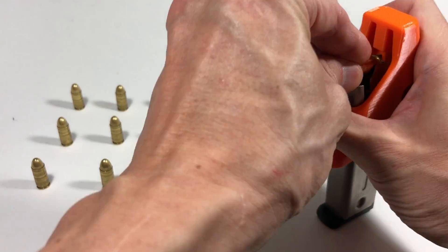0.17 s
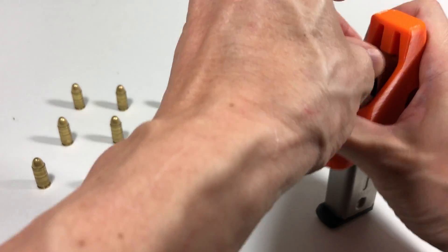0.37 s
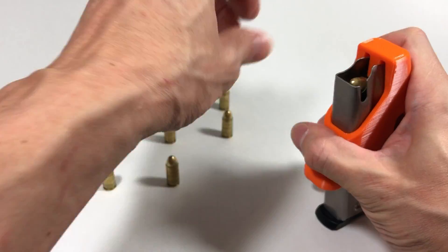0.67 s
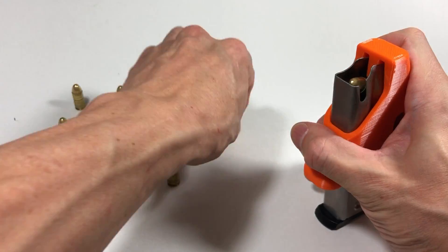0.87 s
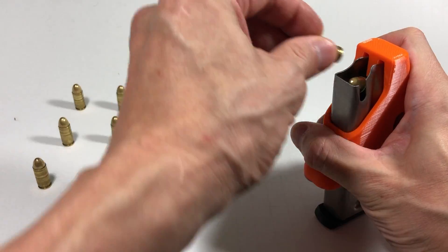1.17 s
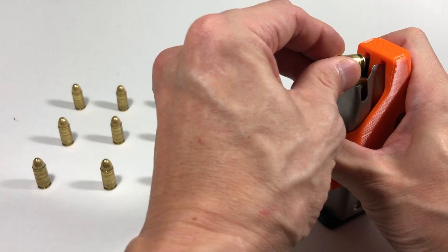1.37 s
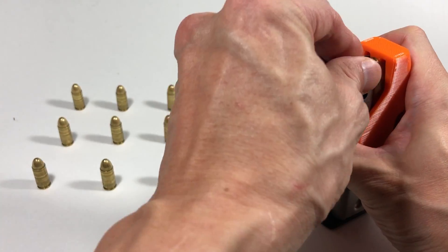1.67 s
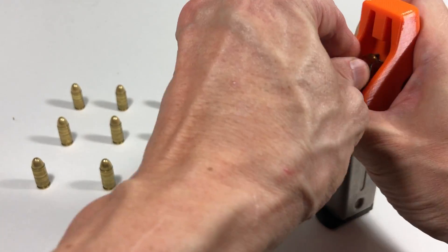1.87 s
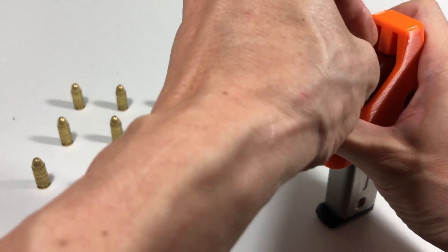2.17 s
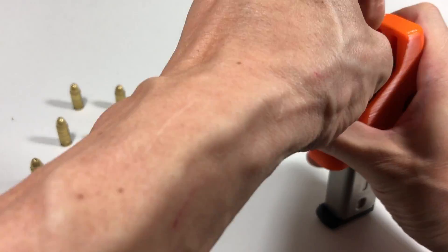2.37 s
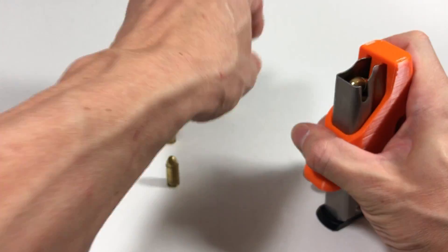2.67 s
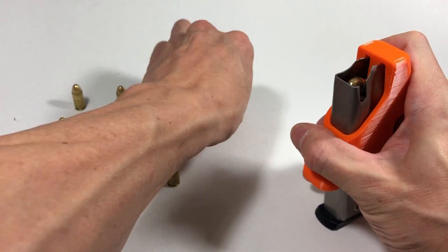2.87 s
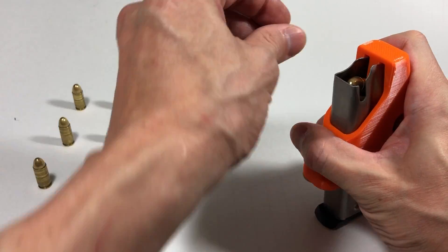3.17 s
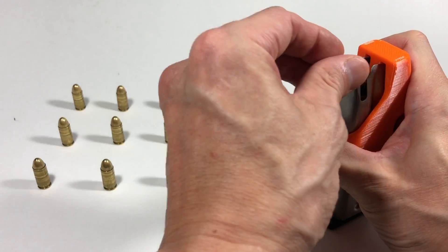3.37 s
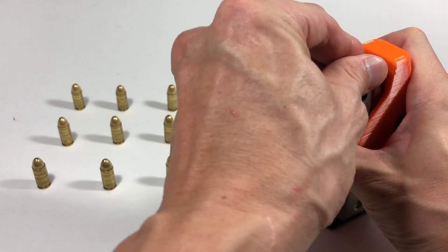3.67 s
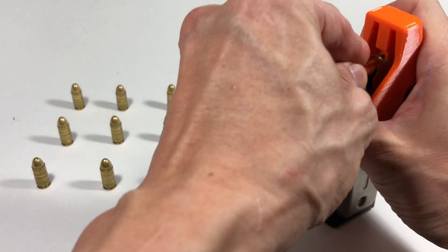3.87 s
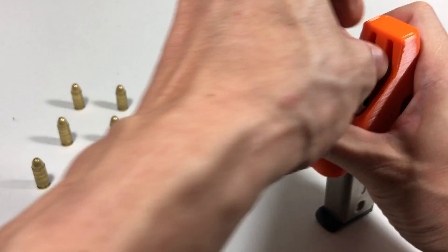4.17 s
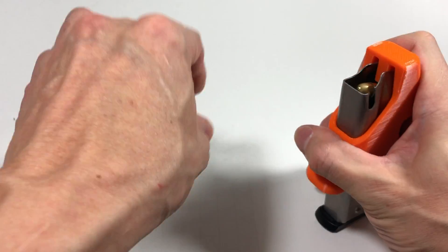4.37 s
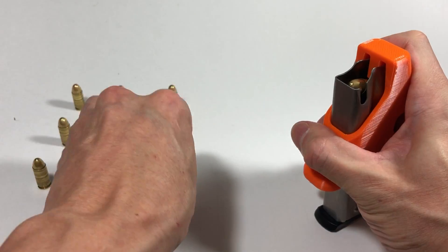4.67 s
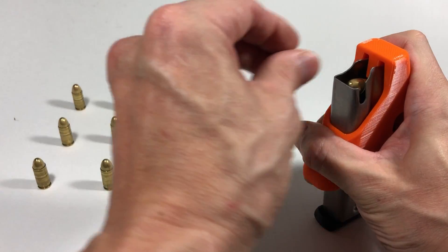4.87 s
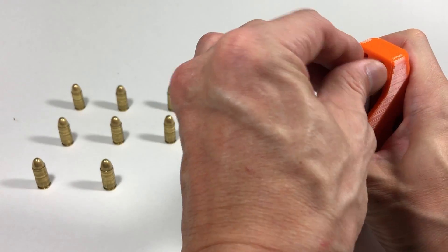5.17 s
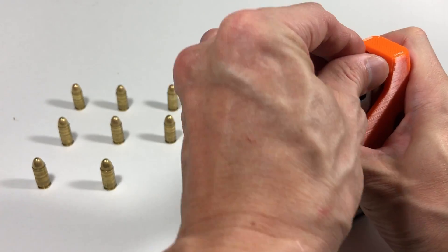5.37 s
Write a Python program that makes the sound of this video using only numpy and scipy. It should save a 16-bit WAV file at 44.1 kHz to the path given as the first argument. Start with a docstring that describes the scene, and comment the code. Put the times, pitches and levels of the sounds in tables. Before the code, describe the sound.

Hand loading of a magazine over a table, heard near the microphone. Crisp brass-on-steel snaps alternate with hollow plastic knocks, gritty slides and dull thuds. Bursts cluster early, around one and a half to two and a half seconds, and near four; a very bright snap comes after five. Faint room hiss and short reflections surround it.

```python
"""Loading cartridges into a magazine

Brass cartridges are pressed one by one through a plastic loader into a steel magazine on a table.
Each contact snaps in the metal and sends a bending wave through the table top, treble first, bass last.
Between clicks, irregular stick-slip jerks scrape the loader and rounds along the steel.
Light taps, rattling rounds, low bumps and two squeaks join in; a small quiet room answers."""
import sys
import numpy as np
from scipy import signal
from scipy.fft import rfft, irfft, next_fast_len
from scipy.io import wavfile
from scipy.ndimage import uniform_filter1d

SR = 44100
rng = np.random.default_rng(int(sys.argv[2]) if len(sys.argv) > 2 else 0)


def transcribe(signal):
    """Save signal, clipped to [-1, 1], as a 16-bit WAV file at the path in sys.argv[1]."""
    frames = np.atleast_2d(signal).T
    limited = np.clip(frames, -1, 1)
    pcm = np.round(limited * 32767).astype(np.int16)
    wavfile.write(sys.argv[1], SR, pcm)


N = 243431

# Loader strokes: start t/s, end t/s, table rumble level/dB and steel scrape level/dB (both before
# the band gains), swell from start to end/dB
SLIDES = [(0.045, 0.067, -52, -62, 9.5), (0.074, 0.13, -41.5, -46.5, -5.5), (0.132, 0.187, -54, -71, -2.5),
          (0.299, 0.37, -72, -66, -4), (0.409, 0.462, -56, -53.5, 22.5), (0.643, 0.73, -43, -51, 13),
          (1.364, 1.373, -65, -56, 3), (1.637, 1.71, -61.5, -60.5, -6), (1.835, 1.906, -42, -47, 5),
          (1.907, 1.968, -54, -64.5, -6.5), (2.031, 2.175, -59.5, -70, 1), (2.167, 2.208, -68, -57.5, 8),
          (2.342, 2.382, -50.5, -50, 0.5), (2.495, 2.572, -51, -56.5, 9), (2.628, 2.67, -33.5, -38, 10.5),
          (3.429, 3.576, -70, -65, 1), (3.756, 3.825, -45.5, -49, 7), (3.819, 3.857, -42, -58, -3),
          (3.953, 3.986, -49, -72, -2), (4.042, 4.095, -58.5, -51.5, 6), (4.104, 4.147, -48.5, -65, -5),
          (4.191, 4.29, -46.5, -74, 6), (4.301, 4.333, -40, -45, -4), (4.391, 4.431, -41.5, -50, -5),
          (4.503, 4.518, -61, -53.5, 7), (4.557, 4.58, -58.5, -73.5, 1), (5.204, 5.25, -64.5, -72, -9)]
# Magazine and loader resonances: f/Hz, width/Hz, lift/dB
MAGAZINE_MODES = [(2220, 130, 17), (3650, 450, 0.5), (4190, 76, 3), (4825, 450, 1.5), (6840, 760, 7.5),
                  (7670, 400, 5.5), (8550, 330, 6), (9550, 270, 4.5), (12300, 500, 1.5), (13600, 300, -10)]
# Table top resonances: f/Hz, width/Hz, lift/dB
TABLE_MODES = [(50.3, 3.3, 14), (102, 92, 5.5), (170, 14, -3), (271, 15, 2), (373, 32, 8.5), (459, 23, 4),
               (524, 60, 3.5), (840, 110, 2.5), (1006, 350, 3.5)]
# Lasting tones of table and frame: f/Hz, relative level/dB, t60/s
RING_TONES = [(156, -6, 1.0), (225, -6, 1.3), (355, -11, .9), (404, -3, 1.0), (549, -15, 1.8),
              (635, -7, 1.4), (791, -1, 1.6), (888, -10, 1.7)]
# Room decay: f/Hz, t60/s
ROOM_T60 = [(60, 0.09), (250, 0.91), (700, 0.4), (2000, 0.425), (5000, 0.27), (9000, 0.3), (16000, 0.52)]
# Room tail: f/Hz, level/dB
ROOM_LEVEL = [(60, -1), (150, -2), (400, -15.5), (1000, -11.5), (2500, -9), (5000, -9.5), (9000, -18.5),
              (16000, -26.5)]
# Still air spectrum: f/Hz, relative density level/dB
AIR_SPECTRUM = [(20, -15.5), (50, 1), (120, -2), (300, -8), (700, -11), (1500, -23), (4000, -26),
                (10000, -28.5), (16000, -36.5)]
# Magazine base leaning into the table: t/s, energy level/dB, f/Hz
BUMPS = [(1.867, -23.5, 101), (2.212, -29, 126.3), (2.665, -16, 119), (4.564, -22.5, 79.3)]
# Plastic squeaking on steel: start t/s, end t/s, slip rate/Hz, level/dB
SQUEAKS = [(4.342, 4.373, 560, -50.5), (4.507, 4.519, 650, -54)]
# Brass against the steel lips: t/s, metal energy level/dB, snap over clack/dB,
# loader and table level before offsets/dB, contact decay/s
SNAPS = [(0.072, -20.5, 6.5, -25, 0.0026), (0.0798, -3, 3, -26.5, 0.0015), (0.4516, -8, -8, -10, 0.0024),
         (0.4599, -2, -2, -12, .0008), (0.653, -16, -2.5, -22.5, 0.0052), (0.66, -7.5, 3.5, -30.5, 0.0025),
         (0.666, -12.5, -4.5, -22.5, 0.00079), (0.732, -5.5, 6.5, -12.5, 0.0027),
         (1.279, -6.5, -5, -16, 0.0059), (1.4338, -11.5, 3.5, -20.5, 0.0028),
         (1.5378, -14.5, 0.5, -16, 0.0087), (1.5662, 3.5, 12, -10.5, 0.0025),
         (1.57, 3, 15.5, -15.5, 0.0054), (1.841, -2, 13, -25, 0.0016), (1.852, -9, 6, -25, .0012),
         (2.3377, -0.9, 2.5, -24, 0.0014), (2.385, -9, -2.5, -15, .0008), (2.662, -5, 6.5, -17.5, 0.0011),
         (3.403, -3.5, 0.5, -16.5, 0.0067), (3.7428, -23, 8, -34, 0.0018), (3.7919, -4, 34, -19, 0.0019),
         (4.046, -15, 2.5, -32, 0.0017), (4.407, -12, -2, -17.5, 0.0043), (4.417, -6.5, 9, -13.5, 0.0019),
         (4.431, -11, 6, -16, 0.00092), (5.028, -13.5, 2, -19.5, 0.008), (5.2405, -4.5, 2, -6.5, 0.0047),
         (5.2435, 4, 11.5, -11, 0.0065), (5.514, -13.5, 7, -20, 0.011)]
# Push bottoms out, magazine knocks on the table: t/s, thud level before gain/dB, thud f/Hz, clack level/dB
KNOCKS = [(0.4407, -5.5, 360, -9), (0.471, -15.5, 230, -34), (0.674, -10.5, 373, -27),
          (0.7076, -19, 340, -21), (0.9849, -32, 354, -43), (1.867, -9, 335, -16), (2.2033, -1, 390, -14.5),
          (2.375, -11, 350, -18.5), (2.55, -14, 330, -22.5), (2.633, -14.5, 418, -30), (2.669, 1, 360, -16),
          (3.502, -29.5, 330, -38), (3.5776, -22, 400, -34), (3.7674, -13, 372, -21),
          (4.085, -5.5, 324, -10), (4.098, -6, 320, -41), (4.104, -13, 265.4, -23),
          (4.186, -12.5, 238, -15.5), (4.241, -18, 312, -45), (4.397, -12.5, 450, -41),
          (4.533, -24.5, 388, -58), (4.55, -19, 346, -27), (4.564, -10.5, 290, -27), (5.028, -14, 394, -30),
          (5.463, -29.5, 290, -46.5)]
# Round rocking lightly in the loader: t/s, knock level/dB, knock f/Hz, clack level/dB
TAPS = [(0.3172, -36.5, 1960, -23.5), (0.35, -32, 2220, -40), (0.5905, -24, 2400, -25.5),
        (1.3721, -26.5, 1750, -34), (1.5381, -20, 1716, -35.5), (1.707, -19, 1700, -42),
        (2.0994, -41.5, 2500, -32), (2.118, -25, 2266, -31), (3.4131, -15, 2300, -26),
        (3.593, -15, 2020, -23.5), (3.846, -25.5, 2000, -22.5), (3.9016, -28, 2170, -35),
        (3.978, -31, 2240, -31.5), (4.279, -25.5, 2300, -26.5), (5.115, -19, 2030, -18.5),
        (5.369, -18, 1911, -30)]

AIR_DB = -70.5  # rms
EDGE_HZ = 16500
LEAD_S = .05  # stroke envelope starts this early
# Rumble pitch rises from dull to keen once the steel bites (scrape minus rumble level)
DULL_HZ, KEEN_HZ, KEEN_AT_DB, KEEN_WIDTH_DB = 200, 377, -9, 4.5
SNAP_THUD_HZ, SNAP_THUD_DB, SNAP_KNOCK_HZ, SNAP_KNOCK_DB = 358, -4, 2320, -0.5
# Accented metal mode falls with brightness, capped at EDGE_HZ
SNAP_RING_HZ, RING_OCTAVES_PER_DB = 7500, -2
# Whole-magazine jolt: steep level law, so the hardest snaps dominate
SEAT_HZ, SEAT_DB, SEAT_DB_PER_DB, SEAT_RING_S, SEAT_LAG_S = 981, -23.5, 3, 0.0029, .002
KNOCK_HZ, KNOCK_DB, KNOCK_RING_HZ, KNOCK_SNAP_DB, KNOCK_DECAY_S = 880, -9, 4850, -3, 0.0018
TAP_THUD_HZ, TAP_THUD_DB, TAP_RING_HZ, TAP_SNAP_DB, TAP_DECAY_S = 290, -9, 4230, -6.5, .0008
# Fingers that press harder also damp the wall, so its level is capped
WALL_HZ, WALL_RING_S, TAP_WALL_DB, WALL_LIMIT_DB = 2180, .0024, -1, -26
# Energy over the scrape level, and its scatter either way
RATTLE_DB, RATTLE_SPREAD_DB = 18.5, 10


def amp(db):
    """Converts dB to an amplitude factor."""
    return 10 ** (np.asarray(db) / 20)


def unit(x):
    """Scales to energy 1."""
    return x / np.sqrt(np.sum(x ** 2) + 1e-20)


def evened(x):
    """Scales to rms 1."""
    return unit(x) * np.sqrt(len(x))


def read(points, hz):
    """Interpolates a spectrum on a log-frequency axis."""
    f, value = np.transpose(points)
    return np.interp(np.log(hz + 1), np.log(f), value)


def add(mix, start_s, sound):
    """Mixes a sound in at start_s, in place."""
    part = mix[..., max(round(start_s * SR), 0):][..., :sound.shape[-1]]
    part += sound[..., :part.shape[-1]]


def band(x, lo_hz, hi_hz, order=2):
    """Causal band-pass."""
    edges_hz = [lo_hz, min(hi_hz, .48 * SR)]
    return signal.sosfilt(signal.butter(order, edges_hz, "bandpass", fs=SR, output="sos"), x)


def body(x, modes):
    """Lifts each resonance of a body out of the sound that drives it."""
    for hz, width_hz, db in modes:
        x = x + (amp(db) - 1) * signal.lfilter(*signal.iirpeak(hz, hz / width_hz, SR), x)
    return x


def still_air():
    """Low room rumble and a thin hiss: shaped noise."""
    shape = amp(read(AIR_SPECTRUM, np.fft.rfftfreq(N, 1 / SR)))
    noise = irfft(rfft(rng.standard_normal(N)) * shape, N)
    return amp(AIR_DB) * evened(noise)


def slips(seconds, swell_db, per_s=1500, spread_db=2.5, grit=0.57, rise_s=0.0031, fall_s=.003,
          brush_db=-15, brush_s=0.017, size=13000):
    """Stick and slip: uneven jerks in clumps over faint noise; also returns the stroke's envelope."""
    t = np.arange(size) / SR - LEAD_S
    height = amp(spread_db * np.minimum(rng.exponential(1, size), 3))
    jerks = height * rng.choice([-1, 1], size) * (rng.random(size) < per_s / SR)
    slow_noise = evened(uniform_filter1d(rng.standard_normal(size), size=180))
    clumps = np.exp(grit * np.tanh(slow_noise))
    onset = 1 - np.exp(-np.maximum(t, 0) / rise_s)
    stroke = onset * np.exp(-np.maximum(t - seconds, 0) / fall_s)
    # light brushing just before and after the stroke
    brush = amp(brush_db) * np.exp(-abs(t - np.clip(t, 0, seconds)) / brush_s)
    swell = amp(swell_db * (np.clip(t / max(seconds, .005), 0, 1) - .5))
    drag = (jerks + 0.098 * rng.standard_normal(size)) * clumps
    return drag, np.maximum(stroke, brush) * swell


def slides(rumble_gain_db=-3, rub_gain_db=-4, scrape_gain_db=-2, hiss_gain_db=-3, lift_db=4, width_hz=150):
    """Loader and cartridge drag along the magazine and shake the table: rows (table, metal)."""
    out = np.zeros((2, N))
    for start_s, end_s, rumble_db, steel_db, swell_db in SLIDES:
        drag, stroke = slips(end_s - start_s, swell_db)
        bite = (1 + np.tanh((steel_db - rumble_db - KEEN_AT_DB) / KEEN_WIDTH_DB)) / 2
        rumble_hz = DULL_HZ + (KEEN_HZ - DULL_HZ) * bite
        # broad table band around the rumble pitch
        rumble = band(drag, 29, 1.55 * rumble_hz, order=3)
        rumble = band(rumble, 0.22 * rumble_hz, 3600, order=1)
        rumble = body(rumble, list(TABLE_MODES) + [(rumble_hz, width_hz, lift_db)])
        rumble = amp(rumble_gain_db) * evened(rumble)
        steel = body(drag, MAGAZINE_MODES)
        rub = amp(rub_gain_db) * evened(body(band(steel, 720, 2200), [(2300, 390, 2.5)]))
        scrape = amp(scrape_gain_db) * evened(band(steel, 3000, 6200))
        hiss = amp(hiss_gain_db) * evened(band(steel, 7000, 15500))
        rows = np.array([amp(rumble_db) * rumble, amp(steel_db) * (rub + scrape + hiss)])
        add(out, start_s - LEAD_S, stroke * rows)
    return out


def bending_wave(lag_s, size=8192):
    """A pulse after crossing the table: dispersion delay falls as 1 / sqrt(f), less a fixed offset."""
    hz = np.fft.rfftfreq(size, 1 / SR)
    delay_s = np.clip(lag_s * np.sqrt(1000 / (hz + 1)) - .0048, .0004, .06)
    fade = np.minimum(np.linspace(2, 0, size), 1)
    # phase is the integral of group delay
    return irfft(np.exp(-2j * np.pi * np.cumsum(delay_s) * SR / size)) * fade


def table_blow(lag_s=.0082, edge_lag_s=0.016, edge_db=-11, scatter_db=-7, scatter_s=0.014):
    """Direct bending wave, its echo from the table's edge, and scattered later waves."""
    near, far = rng.uniform(.88, 1.12, 2)
    wave = bending_wave(lag_s * near) + amp(edge_db) * bending_wave(edge_lag_s * far)
    t = np.arange(len(wave)) / SR
    scatter = unit(rng.standard_normal(len(t)) * np.exp(-t / scatter_s))
    scattered = signal.fftconvolve(wave, scatter)[:len(t)]
    return body(wave + amp(scatter_db) * scattered, TABLE_MODES)


def contact(decay_s, spike_db, size=3000, rattle_db=-9, rattle_s=.007, count=4):
    """Force of a contact: a first spike, a dying chatter, and a few small rebounds."""
    t = np.arange(size) / SR
    chatter = unit(rng.standard_normal(size) * np.exp(-t / max(decay_s, .0004)))
    force = chatter + amp(spike_db) * (t == 0)
    hits = 1. * (t == 0)
    for after_s in rng.exponential(rattle_s, count):
        add(hits, after_s, amp(rattle_db) * rng.uniform(-1, 1, 1))
    return signal.fftconvolve(force, hits)[:size]


def metal_blow(decay_s, ring_hz, ring_db=-12, ring_s=0.0035, spike_db=-4,
               main_db=4, main_width_hz=1600, count=120):
    """A contact rings many short modes of case and magazine, with extra lift around ring_hz."""
    force = contact(decay_s, spike_db)
    t = np.arange(len(force)) / SR
    hz = rng.uniform(2000, 16000, (count, 1))
    tones = rng.standard_normal((count, 1)) * np.sin(2 * np.pi * hz * t)
    modes = tones.sum(0) * np.exp(-t / ring_s)
    return body(force + amp(ring_db) * unit(modes), list(MAGAZINE_MODES) + [(ring_hz, main_width_hz, main_db)])


def plastic_knock(wave, decay_s, knock_hz, direct_db=-2, tok_db=5, tok_damping=0.24):
    """The loader's knock: once straight through the air, once by way of the table."""
    knock = unit(signal.fftconvolve(wave, contact(2 * decay_s, spike_db=-0.5)))
    add(knock, 0, amp(direct_db) * unit(contact(2 * decay_s, spike_db=-9.5)))
    return body(band(knock, 700, 2800, order=3), [(knock_hz, tok_damping * knock_hz, tok_db)])


def strike(thud_db, thud_hz, knock_db, knock_hz, clack_db, snap_db, ring_hz, decay_s,
           lift_db=5, thud_width_hz=170):
    """One contact sounds through the table and straight from the metal: rows (table, metal)."""
    wave, blow = table_blow(), metal_blow(decay_s, ring_hz)
    out = np.zeros((2, len(wave) + len(blow)))
    # thud band follows thud_hz
    thud = band(wave, 29, 2 * thud_hz, order=3)
    thud = band(thud, 0.43 * thud_hz, 4000, order=1)
    thud = body(thud, [(thud_hz, thud_width_hz, lift_db)])
    add(out[0], 0, amp(thud_db) * unit(thud))
    add(out[0], 0, amp(knock_db) * unit(plastic_knock(wave, decay_s, knock_hz)))
    add(out[1], 0, amp(clack_db) * unit(band(blow, 3310, 6040)))
    add(out[1], 0, amp(snap_db) * unit(band(blow, 8000, 17500, order=3)))
    return out


def rattle(pitch_hz=2000, pitch_spread_octaves=0.37, knock_db=-3, count=3):
    """Loose rounds jostle at random moments of each stroke; their level follows the scrape."""
    out = np.zeros((2, N))
    for start_s, end_s, _, steel_db, swell_db in SLIDES:
        for along, size, detune in rng.uniform(-1, 1, (count, 3)):
            db = steel_db + swell_db * along / 2 + RATTLE_DB + RATTLE_SPREAD_DB * size
            tune = 2 ** (pitch_spread_octaves * detune)
            at_s = start_s + (end_s - start_s) * (along + 1) / 2
            add(out, at_s, strike(db + TAP_THUD_DB, TAP_THUD_HZ, db + knock_db, pitch_hz * tune,
                                  db, db + TAP_SNAP_DB, TAP_RING_HZ * tune, TAP_DECAY_S))
    return out


def mode(hz, ring_s, rise_s=0.0012):
    """One mode of the magazine, which the hand damps at once."""
    t = np.arange(SR // 20) / SR
    return unit(np.sin(2 * np.pi * hz * t) * np.exp(-t / ring_s) * (1 - np.exp(-t / rise_s)))


def snaps():
    """Hard contacts of brass and steel; brightness shares their energy between clack and snap."""
    out = np.zeros((2, N))
    for at_s, db, bright_db, body_db, decay_s in SNAPS:
        clack_db = db - 10 * np.log10(1 + amp(bright_db) ** 2)
        ring_hz = min(SNAP_RING_HZ * 2 ** (RING_OCTAVES_PER_DB * bright_db), EDGE_HZ)
        add(out, at_s, strike(body_db + SNAP_THUD_DB, SNAP_THUD_HZ, body_db + SNAP_KNOCK_DB, SNAP_KNOCK_HZ,
                              clack_db, clack_db + bright_db, ring_hz, decay_s))
        seat = amp(SEAT_DB + SEAT_DB_PER_DB * db) * mode(SEAT_HZ, SEAT_RING_S)
        add(out[0], at_s + SEAT_LAG_S, seat)
    return out


def tap(db, hz, clack_db):
    """A light, short contact sounds the loader, the metal and the magazine's wall."""
    out = strike(db + TAP_THUD_DB, TAP_THUD_HZ, db, hz,
                 clack_db, clack_db + TAP_SNAP_DB, TAP_RING_HZ, TAP_DECAY_S)
    add(out[1], 0, amp(min(db + TAP_WALL_DB, WALL_LIMIT_DB)) * mode(WALL_HZ, WALL_RING_S))
    return out


def taps():
    """The rounds rock against the loader as the fingers place them."""
    out = np.zeros((2, N))
    for at_s, db, hz, clack_db in TAPS:
        add(out, at_s, tap(db, hz, clack_db))
    return out


def knocks(thud_gain_db=-1):
    """Heavy contacts that go mostly into the table."""
    out = np.zeros((2, N))
    for at_s, db, hz, clack_db in KNOCKS:
        add(out, at_s, strike(db + thud_gain_db, hz, db + KNOCK_DB, KNOCK_HZ,
                              clack_db, clack_db + KNOCK_SNAP_DB, KNOCK_RING_HZ, KNOCK_DECAY_S))
    return out


def bumps():
    """Slow pushes that move only the lowest waves of the table."""
    out = np.zeros(N)
    for at_s, db, hz in BUMPS:
        add(out, at_s, amp(db) * unit(band(table_blow(lag_s=0.00502), hz / 2, 1.32 * hz)))
    return out


def squeaks(jitter=0.068, lo_hz=2500, hi_hz=4000):
    """Plastic on steel: nearly regular slip pulses, band-passed."""
    out = np.zeros(N)
    for start_s, end_s, per_s, db in SQUEAKS:
        size = int(max(end_s - start_s, .005) * SR)
        wobble = evened(uniform_filter1d(rng.standard_normal(size), size=200))
        turns = np.cumsum(per_s * (1 + jitter * wobble)) / SR
        pulses = np.diff(np.floor(turns), prepend=-1)
        squeak = evened(band(pulses, lo_hz, hi_hz)) * signal.windows.tukey(size, .3)
        add(out, start_s, amp(db) * squeak)
    return out


def table_ring(x):
    """A few weakly damped modes, driven by the table signal, hum on."""
    t = np.arange(2 * SR) / SR
    tones = sum(amp(db - 60 * t / t60_s) * np.sin(2 * np.pi * hz * t) for hz, db, t60_s in RING_TONES)
    return amp(-71) * signal.fftconvolve(x, tones)[:N]


def room(x, first_s=0.0067, early_db=-12, early_s=.016, count=9):
    """A few near reflections, then a diffuse tail with a decay time per frequency."""
    hz, t, z = signal.stft(rng.standard_normal(SR), SR, nperseg=512)
    t60_s = read(ROOM_T60, hz)[:, None]
    # tail energy independent of its t60
    height = amp(read(ROOM_LEVEL, hz))[:, None] * np.sqrt(2 * np.log(1000) / (t60_s * SR))
    tail = signal.istft(z * height * amp(-60 * t / t60_s), SR, nperseg=512)[1]
    tail *= np.clip(np.arange(len(tail)) / SR / first_s - 1, 0, 1)
    at = (SR * early_s * rng.uniform(.1, 1, count)).astype(int)
    tail[at] += amp(early_db) * rng.choice([-1, 1], count) / np.sqrt(count)
    return signal.fftconvolve(x, tail)[:N]


def shifting_room(x, half_turn_s=1.283):
    """The arm and the magazine keep moving, so echoes change: three rooms weighted by turning cosines."""
    angle = np.pi * np.arange(N) / SR / half_turn_s
    return sum(room(x * np.cos(angle + k * np.pi / 3)) for k in range(3)) * np.sqrt(2 / 3)


def metal_room(x, spread_hz=330, count=3):
    """Metal radiates different modes each way, smoothing its echoes: frequency-shifted copies, a room each."""
    wave = signal.hilbert(x, next_fast_len(N))[:N]
    t = np.arange(N) / SR
    shifts_hz = np.linspace(-spread_hz, spread_hz, count)
    return sum(room((wave * np.exp(2j * np.pi * hz * t)).real) for hz in shifts_hz) / np.sqrt(count)


def scene(split_hz=3000):
    """Clicks and strokes on the table, in the room."""
    table, metal = snaps() + knocks() + taps() + slides() + rattle()
    table = table + bumps()
    near = table + table_ring(table) + metal + squeaks()
    low = signal.sosfiltfilt(signal.butter(6, split_hz, fs=SR, output="sos"), near)
    return (near + shifting_room(low) + metal_room(near - low) + still_air())[None]


def record(dry):
    """The microphone's bass roll-off and the band limit."""
    thinned = signal.sosfilt(signal.butter(4, 44, "highpass", fs=SR, output="sos"), dry)
    edge = signal.firwin(201, EDGE_HZ, window=("kaiser", 9), fs=SR)
    return signal.oaconvolve(thinned, edge[None], "same")


dry = scene()
out = record(dry)
transcribe(out)
```